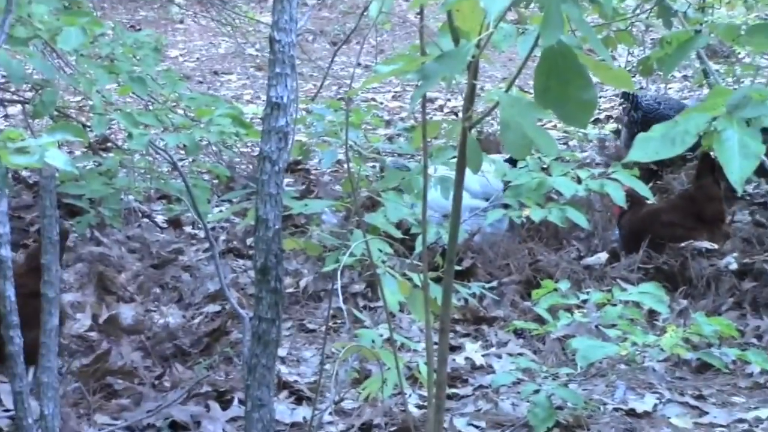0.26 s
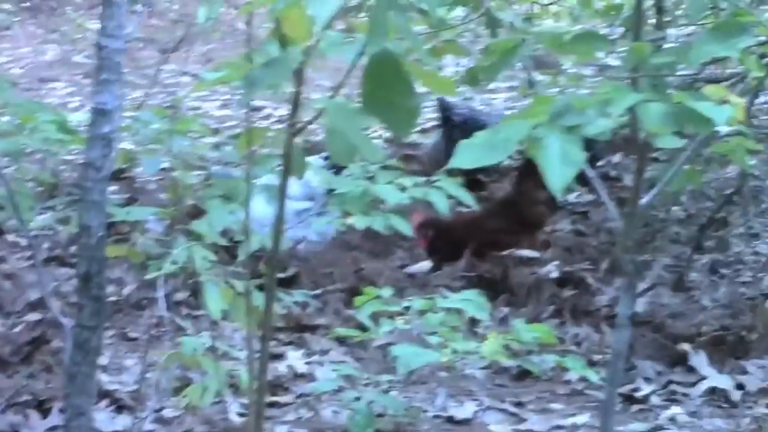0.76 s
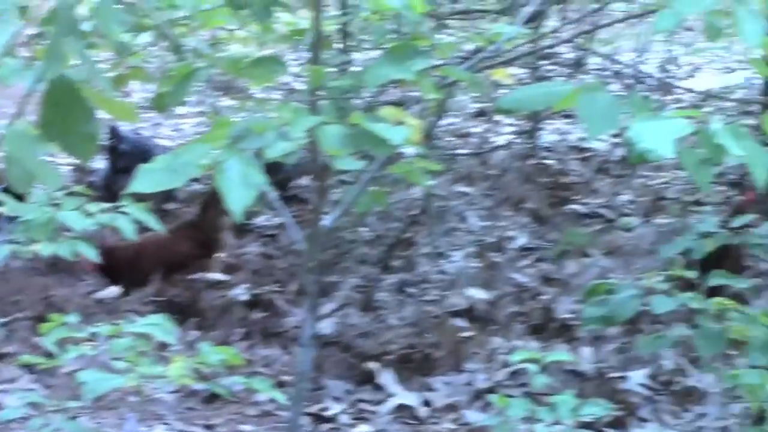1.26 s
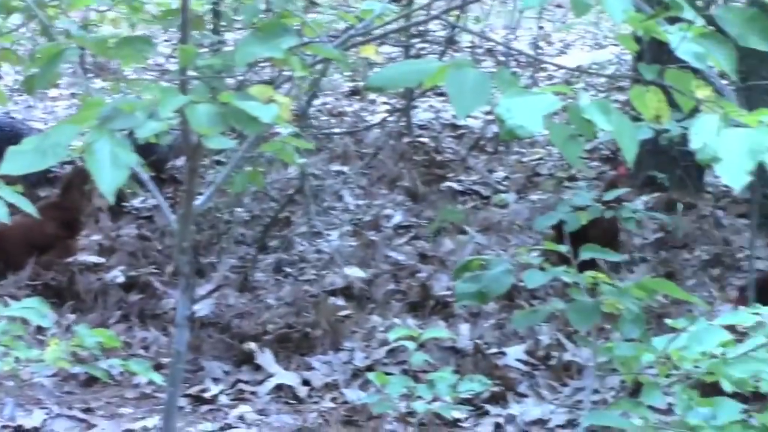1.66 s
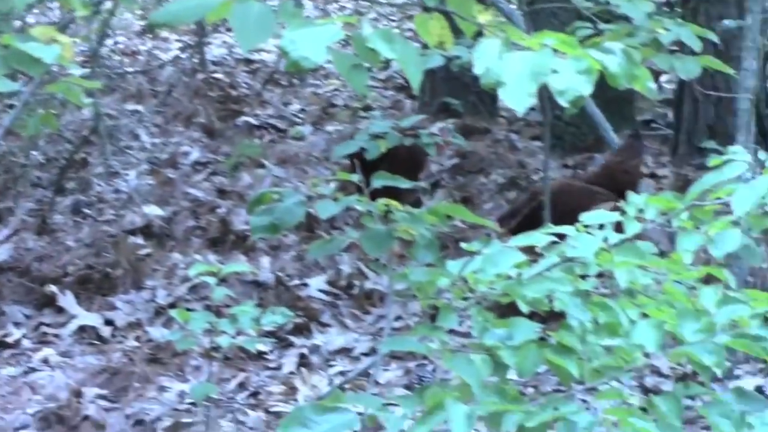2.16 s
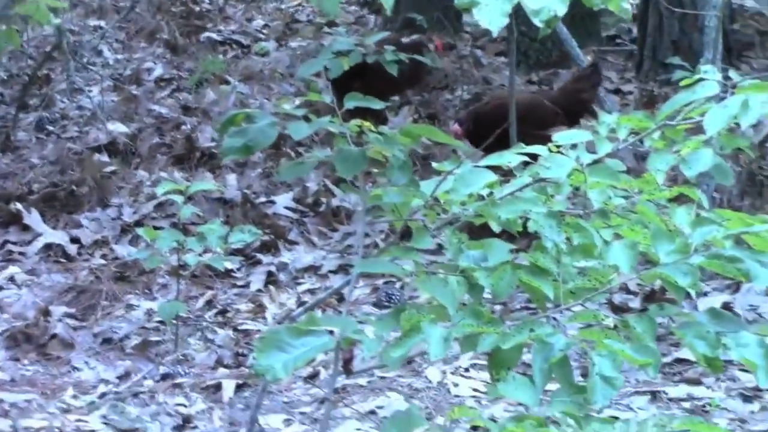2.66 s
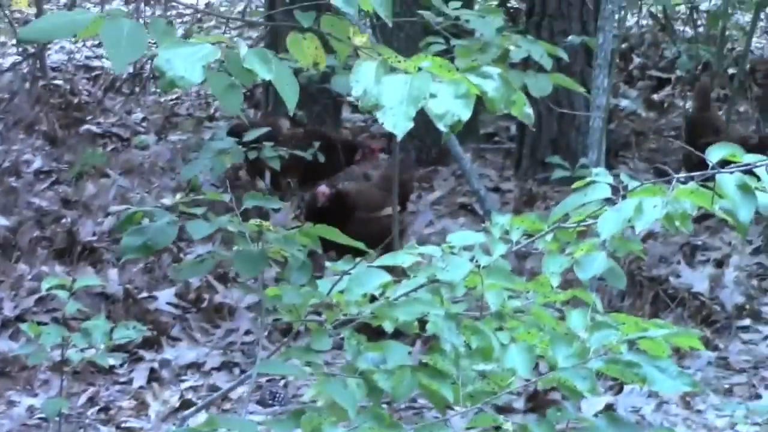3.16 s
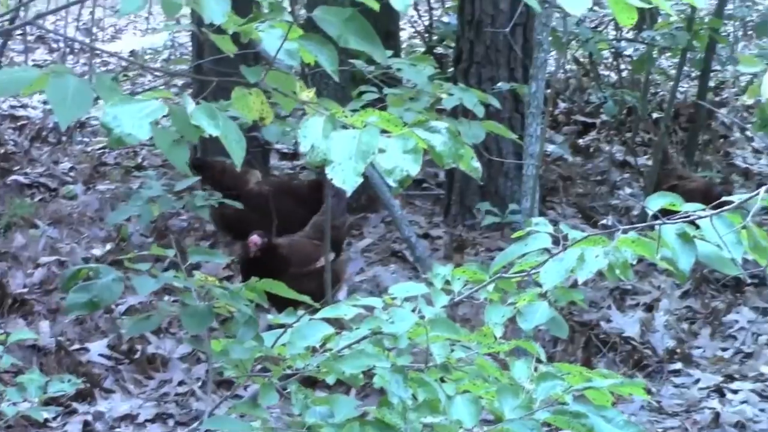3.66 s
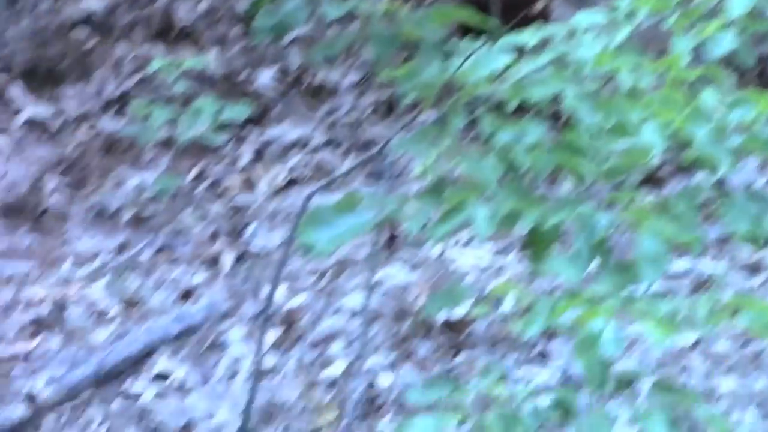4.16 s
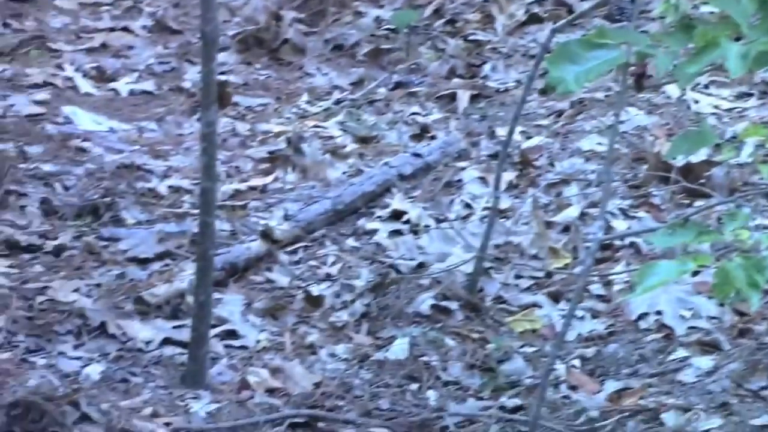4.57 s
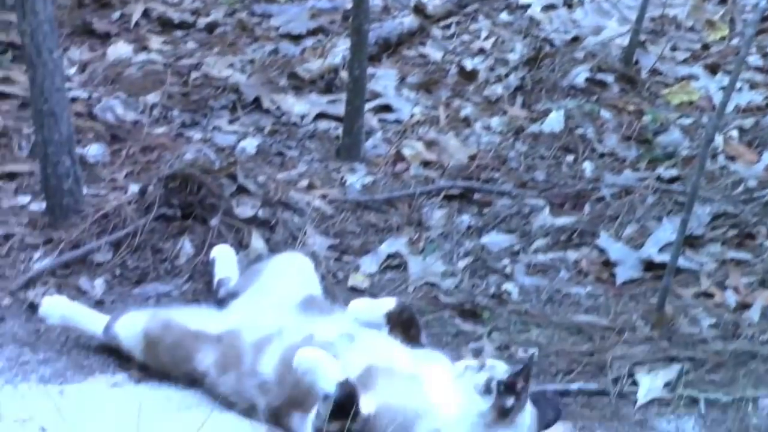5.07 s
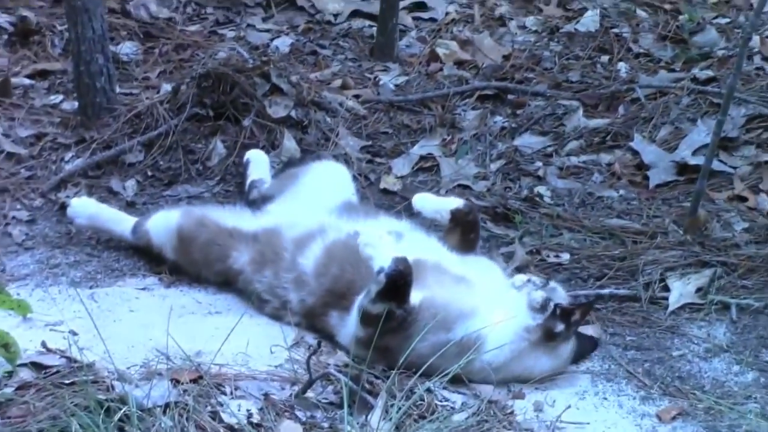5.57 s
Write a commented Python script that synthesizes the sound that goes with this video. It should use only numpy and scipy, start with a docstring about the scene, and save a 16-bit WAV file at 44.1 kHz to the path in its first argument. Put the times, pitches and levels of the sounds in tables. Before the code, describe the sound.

Crisp leaf litter rustles and crunches under scratching chickens, with small stem snaps, a brief early hen whine and a low distant drone.

```python
"""In a wood, a few metres from a hand-held microphone, hens scratch through dry oak leaves and pine straw.
Each stroke is a swarm of tiny leaf cracks with sliding hiss; deeper digs crunch and now and then a stem snaps.
Near the start one hen gives a short arched whine: harmonics shaped by throat resonances.
Behind them lie a far engine, a few wavering low orders, and quiet air of filtered noise."""
import sys
import numpy as np
from scipy import signal
from scipy.fft import rfft, irfft, next_fast_len
from scipy.io import wavfile
from scipy.ndimage import map_coordinates

SR = 44100
rng = np.random.default_rng(int(sys.argv[2]) if len(sys.argv) > 2 else 0)


def to_wav(s):
    """Save 16-bit WAV."""
    ch = np.atleast_2d(s).T  # columns
    pcm = np.round(np.clip(ch, -1, 1) * 32767)  # PCM
    wavfile.write(sys.argv[1], SR, pcm.astype(np.int16))


N = 257103
T = np.arange(N) / SR  # scene time in seconds

# Spectrum of the still air in the wood: frequency [Hz], relative level [dB per Hz]
AIR_SPECTRUM = [(15, -1.5), (30, 0), (55, 3), (90, -1), (120, -3), (180, -4), (300, -5), (480, -7),
                (800, -10), (1400, -16), (3000, -25.5), (8000, -36), (15700, -34)]
# Likeness of the air at left and right: frequency [Hz], correlation [-1 to 1]
AIR_LIKENESS = [(30, 0.51), (110, 0.62), (200, .05), (300, 0.11), (500, 0.39), (900, 0.56), (2000, 1)]
# Swells of the far engine, followed by each order in its share: time_s [s], level_db [dB]
ENGINE_SWELLS = [(0.02, -50), (0.23, -47), (0.42, -54), (0.89, -47), (1.19, -52), (1.78, -53), (1.94, -59),
                 (3.16, -50), (3.39, -56), (3.93, -51), (4.29, -61), (4.42, -52), (4.74, -49), (5.78, -54)]
# Engine orders: multiple of the firing rate, usual level_db [dB], share of the swells [0-1]
ENGINE_ORDERS = [(2, -60, .2), (3, -58.5, 0.7), (4, -64, .1), (5, -52, 0.97), (6, -59, .8)]
# Course of the hen's whine: time_s [s], pitch_hz [Hz], level_db [dB, before the trim in hen()]
WHINE_COURSE = [(0.024, 469.8, -49), (0.038, 474.3, -46), (0.092, 534.8, -43), (0.108, 525.8, -44),
                (0.17, 554.2, -43), (0.328, 534.4, -48), (0.386, 514.3, -57), (0.4, 501.9, -51),
                (0.42, 439.7, -70)]
# Throat resonances with the beak open: centre_hz [Hz], width_hz [Hz], relative level_db [dB]
THROAT_RESONANCES = [(520, 250, -19), (1050, 340, -5.5), (1400, 340, -4), (2140, 540, 4), (2600, 380, 2),
                     (3800, 900, -20)]
# Snapping stems and stiff leaves; a large snap may take several rows, one for each band of its sound:
# start_s [s], peak level_db [dB, before top loss], centre_hz [Hz], spread [octaves]
STEM_SNAPS = [(.6273, -31, 4500, .8), (1.0695, -29, 4000, .8), (1.5427, -28, 6000, .6),
              (1.6427, -27, 2800, 1), (1.7671, -26, 9500, .5), (1.775, -24, 6700, .8),
              (2.955, -31, 3900, .6), (3.3386, -27.5, 2500, .9), (3.4228, -24, 3600, .8),
              (3.5807, -25, 9000, .9), (3.583, -17.5, 11500, .55), (3.583, -26, 2800, .8),
              (3.6967, -17.5, 7400, .75), (3.8417, -23, 3180, .6), (3.8454, -15.5, 4400, 1.3),
              (4.3697, -22, 4500, .8), (4.8921, -30, 7900, .6), (5.0987, -27, 7200, .5),
              (5.4174, -20, 9500, .5)]
# Heavy strokes down into the packed litter: centre_s [s], length_s [s], level_db [dB]
DEEP_DIGS = [(1.65, .2, -55), (3.243, 0.16, -51.5), (3.852, .04, -42), (3.92, .06, -49),
             (4.386, 0.079, -52), (5.24, 0.063, -44), (5.32, 0.04, -44.5), (5.645, 0.27, -48)]
# Spectrum of the packed litter's crunch: frequency [Hz], relative level [dB per Hz]
PACKED_SPECTRUM = [(150, -23), (550, -4), (1000, -2.5), (1700, 0), (3000, -4), (7000, -17)]
# Spectrum of the leaves at usual crispness: frequency [Hz], relative level [dB per Hz]
LEAF_SPECTRUM = [(250, -22), (600, -6.5), (1100, -7.5), (1700, -2), (2700, 0), (3900, .8), (4700, -1.8),
                 (6200, -0.45), (8000, -1.5), (10300, -2.5), (12500, -7.5), (15700, -15)]
# Strokes of a foot through the leaves: full_force_s [s], rise_s [s], hold_s [s], level_db [dB],
# crispness_db [dB, more means a larger treble share]
FOOT_STROKES = [(0.015, 0.075, 0.085, -48.5, -0.5), (0.21, 0.06, 0.045, -40.5, -3.5),
                (0.53, 0.065, 0.24, -43.0, -3.0), (0.85, 0.04, 0.265, -46.5, -4.5),
                (1.22, 0.08, 0.025, -47.0, -3.0), (1.53, 0.1, 0.19, -43.5, -4.0),
                (1.76, 0.04, 0.005, -45.5, 0.5), (1.94, 0.1, 0.075, -45.5, -5.5),
                (2.17, 0.11, 0.05, -42.5, -3.5), (2.72, 0.095, 0.06, -48.5, -2.0),
                (2.805, 0.02, 0.005, -43.0, -4.0), (2.965, 0.145, 0.1, -43.5, -3.5),
                (3.14, 0.05, 0.115, -39.0, -3.5), (3.325, 0.055, 0.07, -44.5, -3.0),
                (3.425, 0.04, 0.045, -40.5, -5.0), (3.545, 0.025, 0.26, -42.0, -5.5),
                (3.853, 0.033, 0.008, -35.0, -2.5), (3.905, 0.01, 0.12, -42.5, -4.5),
                (4.15, 0.08, 0.055, -39.5, -5.0), (4.305, 0.05, 0.05, -40.0, -4.0),
                (4.385, 0.025, 0.04, -35.0, -3.5), (4.44, 0.01, 0.07, -42.5, -4.0),
                (4.645, 0.08, 0.42, -47.0, -5.5), (5.235, 0.065, 0.06, -34.0, -8.0),
                (5.31, 0.01, 0.035, -35.0, -7.5), (5.385, 0.015, 0.02, -34.0, -5.5),
                (5.515, 0.08, 0.12, -38.5, -7.0), (5.645, 0.06, 0.175, -38.0, -5.5)]

AIR_DB = -50
FIRING_HZ, SPEED_DRIFT = 26.19, .003  # the engine runs at a governed speed; drift is an rms share
BEAK_WIDEST_S = .13
BEAK_OPEN_S, BEAK_SHUT_S = .17, .21  # the beak opens quicker than it closes
THROAT_SINK = .15  # share by which the resonances drop when the beak is shut
RELEASE_DB_PER_S = 140  # the leaves settle after a stroke
TIRE_DB_PER_S = 7  # the foot slows as it drags
RESTLESS_DB, RESTLESS_CRISP_DB = -53.5, -5.5  # steady floor: the rest of the flock never quite keeps still
EDGE_HZ = 15780  # upper band edge of the recorder


def gain_of(db):
    """Turns decibels into an amplitude factor."""
    return 10 ** (np.asarray(db) / 20)


def evened(x):
    """Scales a sound to rms 1."""
    return x / np.sqrt(np.mean(x ** 2) + 1e-20)


def read(points, hz):
    """Reads a spectrum on a log-frequency axis."""
    point_hz, value = np.transpose(points)
    return np.interp(np.log(hz + 1), np.log(point_hz + 1), value)


def curves(rows):
    """Draws each column after the time as a curve over the whole scene."""
    time_s, *columns = np.transpose(rows)
    return [np.interp(T, time_s, column) for column in columns]


def add(mix, start_s, sound):
    """Mixes a sound in at its start time."""
    part = mix[max(round(start_s * SR), 0):][:len(sound)]
    part += sound[:len(part)]


def colour(x, points):
    """Filters a sound by a spectrum in dB."""
    size = next_fast_len(len(x))
    gain = gain_of(read(points, np.fft.rfftfreq(size, 1 / SR)))
    return irfft(rfft(x, size) * gain, size)[:len(x)]


def wander(per_s):
    """Smooth random curve of rms 1, with per_s random knots each second."""
    knots = rng.standard_normal(8192)
    return evened(map_coordinates(knots, [T * per_s], order=2, mode="wrap"))


def air():
    """Soft outdoor noise, wide in the low middle and mono in the treble."""
    hz = np.fft.rfftfreq(N, 1 / SR)
    likeness = np.clip(read(AIR_LIKENESS, hz), -1, 1)
    noise = rfft(rng.standard_normal((2, N))) * gain_of(read(AIR_SPECTRUM, hz))
    mid, side = noise * np.sqrt([1 + likeness, 1 - likeness])
    return gain_of(AIR_DB) * evened(irfft(np.array([mid + side, mid - side]), N))


def engine(waver_db=2.8, usual_db=-52, apart_rad=0.52):
    """Only the low orders of a far engine carry through the trees, each wavering on its way."""
    level_db, = curves(ENGINE_SWELLS)
    phase = 2 * np.pi * np.cumsum(FIRING_HZ * (1 + SPEED_DRIFT * wander(1.5))) / SR
    side_phase = np.array([[apart_rad], [-apart_rad]]) / 2  # left leads right
    hum = np.zeros((2, N))
    for order, order_db, swing in ENGINE_ORDERS:
        swell_db = swing * (level_db - usual_db)
        own_waver_db = waver_db * (0.5 - swing / 2) * wander(5)
        level = np.sqrt(2) * gain_of(order_db + swell_db + own_waver_db)  # rms to peak
        hum += level * np.cos(order * phase + side_phase + 2 * np.pi * rng.random())
    return hum


def wood(x, t60=.22, wet_db=-11):
    """Trunks and foliage scatter a thin, short tail of sparse random echoes."""
    t = np.arange(SR // 2) / SR
    sparse = rng.standard_normal(len(t)) * (rng.random(len(t)) < 2000 / SR)  # 2000 echoes a second
    taps = sparse * (t > .002) * gain_of(-60 * t / t60)
    return x + gain_of(wet_db) * signal.oaconvolve(x, taps / np.linalg.norm(taps))[:N]


def hen(shut_db=-20, valley_db=-26, trim_db=-1.2, jitter=.006, flutter_db=2.2):
    """Unsteady whine; resonances sink and the harmonics above the second fade as the beak closes."""
    pitch_hz, level_db = curves(WHINE_COURSE)
    since = T - BEAK_WIDEST_S
    beak = np.exp(-abs(since / np.where(since < 0, BEAK_OPEN_S, BEAK_SHUT_S)) ** 2.5)  # 1 = widest
    pitch_hz = pitch_hz * (1 + jitter * wander(199))
    phase = 2 * np.pi * np.cumsum(pitch_hz) / SR
    sunk = 1 - THROAT_SINK * (1 - beak)
    voice, power = np.zeros(N), np.zeros(N)
    for k in range(1, 9):
        gain = gain_of(valley_db)  # what passes between the resonances
        for centre_hz, width_hz, db in THROAT_RESONANCES:
            offset = 2 * (k * pitch_hz - centre_hz * sunk) / width_hz
            gain = gain + gain_of(db) / (1 + offset ** 4)
        gain = gain * gain_of(shut_db * (1 - beak) * np.clip(k / 2 - 1, 0, 1))
        # paths round the trunks make each partial swell and fade on its own
        voice += gain * gain_of(flutter_db * wander(47)) * np.cos(k * phase)
        power += gain ** 2 / 2
    begin_s, end_s = WHINE_COURSE[0][0], WHINE_COURSE[-1][0]
    sounding = np.clip(np.minimum(T - begin_s, end_s - T) / 0.008, 0, 1)  # 8 ms fades
    return sounding * gain_of(level_db + trim_db) * voice / np.sqrt(power)


def crack(centre_hz, octaves, t60, shatter=1):
    """A dry fracture: a sharp step of stress, then splinters, through the broad band of a leaf or stem."""
    t = np.arange(1024) / SR
    hz = np.fft.fftfreq(1024, 1 / SR)
    distance = np.log2((abs(hz) + 1) / centre_hz) / octaves
    log_gain = np.maximum(-.5 * distance ** 2, -7)
    causal = np.exp(np.conj(signal.hilbert(log_gain)))  # minimum phase: no sound before the break
    splinters = shatter * rng.standard_normal(len(t)) * gain_of(-60 * t / t60)
    burst = (t == 0) + splinters
    return np.fft.ifft(np.fft.fft(burst) * causal).real


def snaps(t60=0.0056, shatter=0.3, top_loss_db=-6):
    """Stems and stiff leaves snap, in one band or several; their highest treble is softened."""
    out = np.zeros(N)
    for start_s, level_db, centre_hz, octaves in STEM_SNAPS:
        snap = crack(centre_hz, octaves, t60, shatter)
        add(out, start_s, gain_of(level_db) * snap / abs(snap).max())
    return colour(out, [(10000, 0), (15700, top_loss_db)])


def crackle(per_s, spread_db, t60, count=48):
    """Many leaves crack at random moments with differing force, spread_db setting how much."""
    force = gain_of(spread_db * np.minimum(rng.exponential(1, N), 4.5))
    force *= rng.random(N) < per_s / SR
    force *= rng.choice([-1, 1], N)
    leaf = rng.integers(0, count, N)
    centres_hz = np.linspace(np.sqrt(1000), np.sqrt(15000), count) ** 2
    swarm = np.zeros(N)
    for k, centre_hz in enumerate(centres_hz):
        swarm += signal.oaconvolve(force * (leaf == k), evened(crack(centre_hz, 0.82, t60)))[:N]
    # level the spectrum: the swarm as a whole favours no band
    hz, power = signal.welch(swarm, SR, nperseg=1024)
    return evened(colour(swarm, np.c_[hz, -10 * np.log10(power + .1 * power.mean())]))


def digs():
    """A foot dragged through the packed layer gives a lower, coarser crunch."""
    push = np.zeros(N)
    for centre_s, length_s, level_db in DEEP_DIGS:
        push += gain_of(level_db) * np.exp(-(2 * (T - centre_s) / length_s) ** 2)
    return push * evened(colour(crackle(per_s=1500, spread_db=2, t60=0.0056), PACKED_SPECTRUM))


def stroke(full_force_s, rise_s, hold_s):
    """The force of one stroke swells, sags a little while the foot drags, and dies away."""
    early = np.maximum(full_force_s - T, 0)
    late = np.maximum(T - full_force_s - hold_s, 0)
    drag = np.clip(T - full_force_s, 0, hold_s)
    return np.exp(-early / rise_s) * gain_of(-TIRE_DB_PER_S * drag - RELEASE_DB_PER_S * late)


def stir():
    """Litter level and crispness in dB: strokes add in power, and the strongest dominates the colour."""
    restless = gain_of(RESTLESS_DB) ** 2
    total = np.full(N, restless)
    crisp = np.full(N, restless * RESTLESS_CRISP_DB)
    for full_force_s, rise_s, hold_s, level_db, crispness_db in FOOT_STROKES:
        power = gain_of(level_db) ** 2 * stroke(full_force_s, rise_s, hold_s) ** 2
        total += power
        crisp += power * crispness_db
    return 10 * np.log10(total), crisp / total


def rustle(crack_share=0.53, clump_db=.8, crisp_slope=1.13, usual_crisp_db=-5.0):
    """Cracks and the fine hiss of sliding leaves come in clumps; dry top leaves add treble."""
    level_db, crisp_db = stir()
    cracks = np.sqrt(crack_share) * crackle(per_s=3500, spread_db=0.5, t60=0.0032)
    hiss = np.sqrt(1 - crack_share) * rng.standard_normal(N)
    leaves = evened(colour(cracks + hiss, LEAF_SPECTRUM))
    dull = signal.sosfiltfilt(signal.butter(2, 7000, fs=SR, output="sos"), leaves)
    treble = leaves - dull
    leaves = evened(dull + treble * gain_of(crisp_slope * (crisp_db - usual_crisp_db)))
    return gain_of(level_db) * evened(leaves * gain_of(clump_db * wander(110)))


def scene():
    """The birds are straight ahead of the microphone; air and engine spread between left and right."""
    birds = rustle() + digs() + snaps() + hen()
    return wood(birds) + engine() + air()


def record(dry):
    """The recorder's band limit: a linear-phase low-pass."""
    low_pass = signal.firwin(701, EDGE_HZ, window=("kaiser", 9), fs=SR)
    return signal.oaconvolve(dry, low_pass[None], "same")


dry = scene()
out = record(dry)
to_wav(out)
```